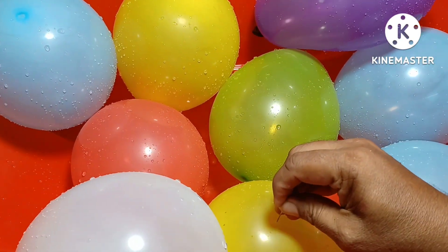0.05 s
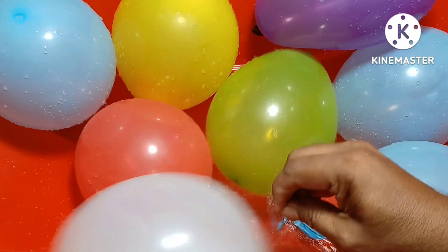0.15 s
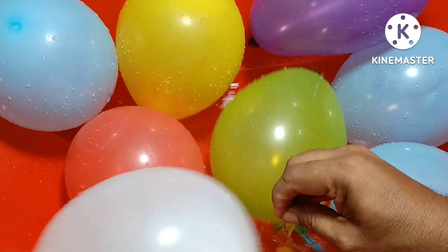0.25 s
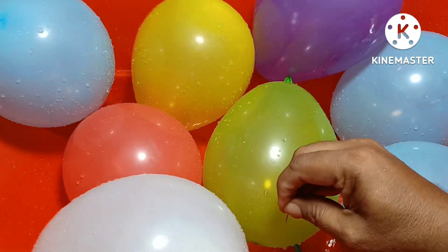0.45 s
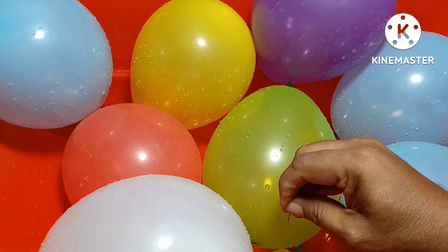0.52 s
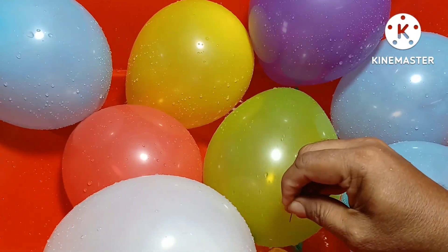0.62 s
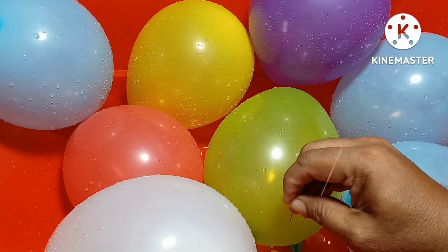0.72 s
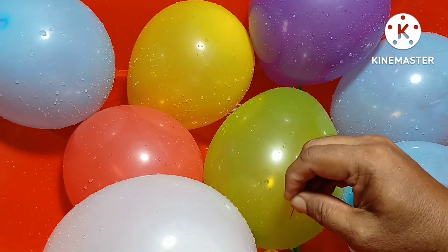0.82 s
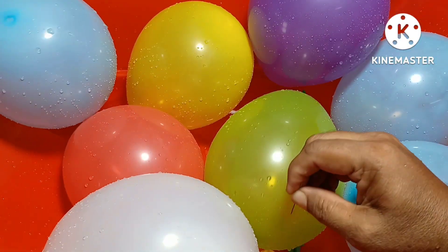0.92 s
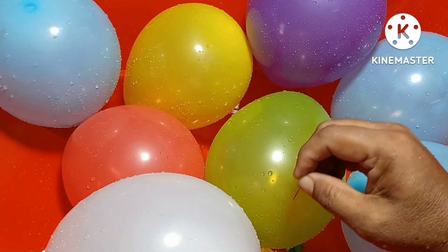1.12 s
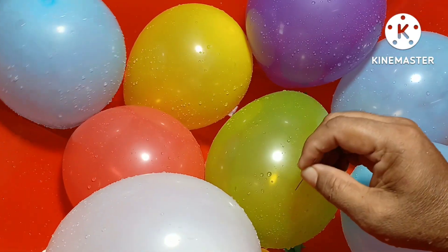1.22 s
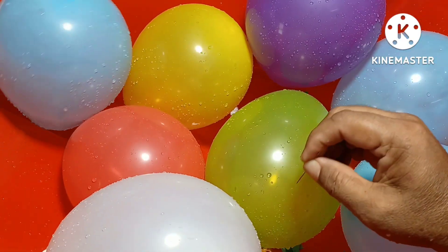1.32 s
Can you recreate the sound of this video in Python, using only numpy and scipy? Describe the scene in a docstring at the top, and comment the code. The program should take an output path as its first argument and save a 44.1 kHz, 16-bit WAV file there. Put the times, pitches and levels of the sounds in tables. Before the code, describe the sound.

One loud balloon pop, followed by a short room boom and faint ticks of falling rubber.

```python
"""A small hard room hums; then a pin bursts a balloon among other balloons, close to a phone.
The skin rips and the air leaves as one pressure wave; the gain control turns everything down.
The room swells, booms and rings on in its low modes.
Rubber scraps tick down and the neighbouring balloons bump, over the lowered hum."""
import sys
import numpy as np
from scipy import signal
from scipy.fft import rfft, irfft
from scipy.io import wavfile

SR = 44100
rng = np.random.default_rng(int(sys.argv[2]) if len(sys.argv) > 2 else 0)


def dump(signal):
    """Clip the signal to [-1, 1] and save it as 16-bit WAV at the path in sys.argv[1]."""
    limited = np.clip(np.atleast_2d(signal).T, -1, 1)
    pcm = np.round(limited * 32767).astype(np.int16)
    wavfile.write(sys.argv[1], SR, pcm)


N = 59535
POP_S = .2056


def undb(db):
    """Decibels to amplitude ratio."""
    return 10 ** (np.asarray(db) / 20)


def since(start):
    """Seconds since a moment, zero before it."""
    return np.maximum(np.arange(N) / SR - start, 0)


def pan(db):
    """Level-difference panning: two gains, the left db above the right."""
    return undb(np.array([[db], [-db]]) / 2)


def bins():
    """Frequencies of the Fourier bins, kept above zero."""
    return np.maximum(np.arange(N // 2 + 1), 1) * SR / N


def on_bins(table):
    """A table's second column, interpolated over log frequency."""
    rows = np.array(table)
    return np.interp(np.log(bins()), np.log(rows[:, 0]), rows[:, 1])


def noise(spectrum_db, correlation):
    """Partly coherent stereo noise of rms 1: the mid-side balance sets the correlation."""
    mid, side = rfft(rng.standard_normal((2, N)))
    c = np.clip(correlation, -.99, .99)
    stereo = np.sqrt(1 + c) * mid + np.sqrt(1 - c) * side * np.array([[1], [-1]])
    x = irfft(undb(spectrum_db) * stereo, N)
    return x / np.sqrt(np.mean(x ** 2))


def fade(t, t60):
    """Exponential decay by 60 dB in t60 seconds."""
    return np.exp(-np.log(1000) * t / t60)


def wave_packets(table):
    """Tones under Gaussian envelopes, down to 1/e one half-width from the peak."""
    t = since(0)
    return sum(undb(db) * np.cos(2 * np.pi * hz * (t - at)) * np.exp(-((t - at) / half_width) ** 2)
               for at, hz, db, half_width in table)


# Spectrum of the room noise (frequency [Hz], relative density [dB])
AMBIENT_SPECTRUM = [(18, -87), (30, -35), (64, -10.5), (100, -17.5), (210, -3), (280, -10.5), (319, -4),
                    (404, -10), (449, -11), (499, -13.5), (1010, -17), (1220, -18), (1430, -20.5),
                    (1590, -21.5), (8300, -50), (10800, -45.5), (16000, -63)]
# Likeness of left and right in the room (frequency [Hz], correlation [-1 to 1])
ROOM_CORRELATION = [(40, 0.19), (130, 0.91), (300, 0.8), (700, 0.46), (1400, -0.29), (3000, 0.044),
                    (16000, -0.1)]
# Hum lines (frequency [Hz], level [dB])
HUM_LINES = [(129.2, -59), (194, -51.5), (318, -48.5), (1211, -59)]

def background():
    """Stationary noise: a continuous spectrum with discrete hum lines in random phase."""
    t = since(0)
    air = undb(-38.5) * noise(on_bins(AMBIENT_SPECTRUM), on_bins(ROOM_CORRELATION))
    hum = sum(np.sqrt(2) * undb(db) * np.sin(2 * np.pi * (hz * t + rng.random()))
              for hz, db in HUM_LINES)
    return air + hum


# Spectrum of the falling shreds (frequency [Hz], relative density [dB])
PATTER_SPECTRUM = [(300, -12), (1500, 3), (4000, 7), (7000, -3), (10000, -5), (14000, 2), (16000, -9)]

def patter(hits_per_s=650, spread_db=3.5):
    """Shot noise: tiny shreds and droplets strike the other balloons at random, ever more faintly."""
    t = since(.31)
    hits = (rng.random((2, N)) < hits_per_s / SR) * undb(spread_db * rng.standard_normal((2, N)))
    polarity = np.sign(rng.standard_normal((2, N)))
    shower = irfft(rfft(hits * polarity) * undb(on_bins(PATTER_SPECTRUM)), N)
    shower /= np.sqrt(np.mean(shower ** 2))
    return undb(-40.5) * (t > 0) * fade(t, t60=.87) * shower


# Rubber scraps and drops landing, and at 0.632 s a knock of a neighbouring balloon # (time [s], level [dB],
# centre [Hz], half-width [octaves], decay T60 [s], left minus right [dB])
LANDINGS = [(0.418, -33, 3940, 0.21, 0.018, -4), (0.463, -53, 4500, 0.76, 0.027, -4),
            (0.4747, -36.5, 9000, 1, .02, -1.5), (0.4957, -42.5, 3240, 0.26, .025, -1),
            (0.503, -50, 14100, 0.27, .03, -2), (0.625, -56, 7000, 0.17, .03, 4),
            (.632, -34, 1170, .13, 0.038, -1.5), (0.6455, -55.5, 6960, 0.58, 0.038, -5),
            (.9874, -62, 14000, 0.39, .02, 0), (1.0483, -48.5, 6000, 1, 0.021, -9),
            (1.093, -50.5, 5500, 1, 0.022, -5)]

def scraps():
    """Impact excitation: each landing is a tick of quickly damped band-pass noise."""
    ticks = 0
    for at, db, hz, octaves, t60, pan_db in LANDINGS:
        t = since(at)
        band_db = -10 * np.log10(1 + (np.log2(bins() / hz) / octaves) ** 4)
        ticks += undb(db) * pan(pan_db) * (t > 0) * fade(t, t60) * noise(band_db, correlation=.13)
    return ticks


# Bumps of the neighbouring balloons (time [s], frequency [Hz], level [dB], half-width [s])
BALLOON_BUMPS = [(.6345, 1198, -42, 0.0017), (.829, 126.9, -29, 0.0037), (.856, 81.5, -30, 0.016)]

def bumps():
    """Soft collisions: balloons on the right radiate a few cycles at each contact."""
    return wave_packets(BALLOON_BUMPS) * pan(-21)


# Low modes of the room (frequency [Hz], level [dB], decay T60 [s])
STANDING_WAVES = [(75.5, -27, 1.6), (128, -21, 2.06), (206.6, -15.5, 0.76), (228.4, -5, .78),
                  (256.3, -15, 0.56), (322, -52, 0.56), (407, -18.5, 0.82), (474.7, -31.5, 0.92),
                  (530, -38, 0.71)]

def room_modes(delay_s=.02, build_s=.035):
    """Resonance: standing waves build up between the walls and outlast the bang."""
    t = since(POP_S + delay_s)
    build = np.minimum(t / build_s, 1)
    return build * sum(undb(db) * np.sin(2 * np.pi * hz * t) * fade(t, t60)
                       for hz, db, t60 in STANDING_WAVES)


# Returns from the walls (time [s], frequency [Hz], level [dB], half-width [s])
WALL_RETURNS = [(.241, 433, -3, 0.0045), (.266, 137.5, -21.5, 0.045), (.2865, 218.2, -4, 0.015)]

def booms():
    """Reflection: the walls send the bang back as low wave packets."""
    return wave_packets(WALL_RETURNS)


# Bands of the reverberant field (frequency [Hz], relative density [dB], decay T60 [s])
REVERB_BANDS = [(35, -20, 1), (69.4, -17, 0.94), (139, -7, 0.84), (250, 0, 0.6), (473, -1, 0.48),
                (750, -5, 0.46), (1500, -9.5, 0.35), (2110, -15, .36), (3400, -19.5, 0.28),
                (4800, -21, 0.28), (8100, -26.5, 0.27), (12500, -22.5, 0.22), (16000, -30, 0.23)]

def reverberation(swell_s=.039, swell_db=5, hold_s=.023):
    """Diffuse field: dense reflections swell, hold and decay exponentially, the treble first."""
    t, decay_time = since(POP_S), since(POP_S + swell_s + hold_s)
    spectrum = rfft(noise(on_bins(REVERB_BANDS), on_bins(ROOM_CORRELATION)))
    centres_hz, _, t60s = np.array(REVERB_BANDS).T
    field = 0
    for t60, selector in zip(t60s, np.eye(len(t60s))):
        triangular_band = np.interp(np.log(bins()), np.log(centres_hz), selector)
        field += irfft(spectrum * triangular_band, N) * fade(decay_time, t60)
    level_db = -10.5 - swell_db * np.maximum(1 - t / swell_s, 0)
    return field * (t > 0) * undb(level_db)


# Spectrum of the ripping skin (frequency [Hz], relative density [dB])
RIP_SPECTRUM = [(100, 5), (300, 10), (1300, -28), (2200, -12), (3300, -6), (4600, -2.5), (6000, -12),
                (9000, -12), (12000, -12), (16000, -6)]

def rip():
    """Release of elastic tension: the skin tears and whips back in a brief broadband burst."""
    t = since(POP_S)
    return undb(-6.5) * (t > 0) * fade(t, t60=.031) * noise(on_bins(RIP_SPECTRUM), correlation=.1)


# Reflections from things close by (delay [s], gain [dB], left minus right [dB])
EARLY_REFLECTIONS = [(.0007, -11.5, -12), (.0034, -26.5, 8), (.0045, -18.5, -5), (.008, -44, -7)]

def blast(push_s=.0008, suction_s=.00042):
    """Blast wave: overpressure, then a shorter, stronger suction of equal impulse, with near echoes."""
    def lobe(start, length):
        return np.sin(np.pi * np.minimum(since(start) / length, 1))

    def wave(start):
        suction = push_s / suction_s * lobe(start + push_s, suction_s)
        return undb(3.5) * (lobe(start, push_s) - suction)

    echoes = sum(undb(db) * pan(pan_db) * wave(POP_S + delay) for delay, db, pan_db in EARLY_REFLECTIONS)
    return wave(POP_S) + echoes


def scene():
    """Superposition: the close sources add to the room's field, which leans slightly right."""
    room = reverberation() + room_modes() + booms() + background()
    return blast() + rip() + scraps() + patter() + bumps() + room * pan(-1.95)


def record(dry, low_cut_hz=58, top_hz=15400, threshold_db=-20, max_cut_db=8.5, release_db_per_s=3):
    """Automatic gain control: a held peak lowers the gain; overload clips; both band edges are cut."""
    x = signal.sosfilt(signal.butter(2, low_cut_hz, "high", fs=SR, output="sos"), dry)
    release_db = release_db_per_s * since(0)
    peak_db = 20 * np.log10(np.abs(x).max(axis=0) + 1e-9)
    held_db = np.maximum.accumulate(peak_db + release_db) - release_db  # jumps up, sinks slowly
    ducked = x * undb(-np.clip(held_db - threshold_db, 0, max_cut_db))
    low_pass = signal.ellip(8, .2, 70, top_hz, fs=SR, output="sos")
    return signal.sosfilt(low_pass, np.clip(ducked, -1, 1))


dry = scene()
out = record(dry)
dump(out)
```